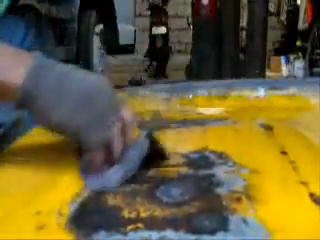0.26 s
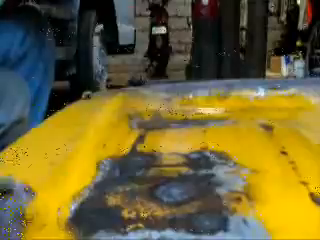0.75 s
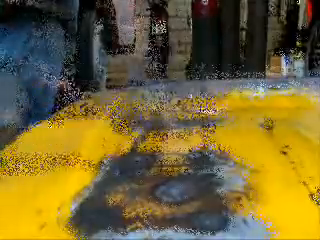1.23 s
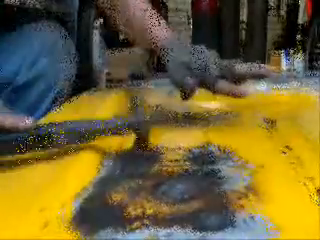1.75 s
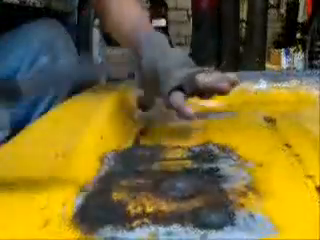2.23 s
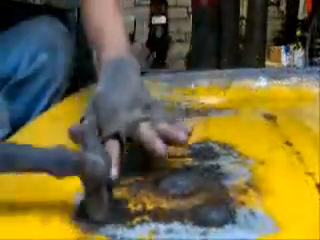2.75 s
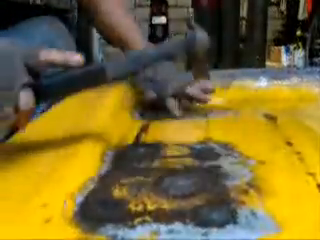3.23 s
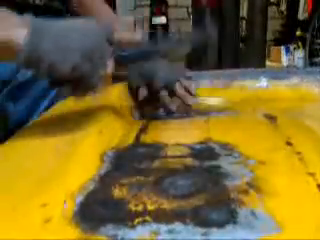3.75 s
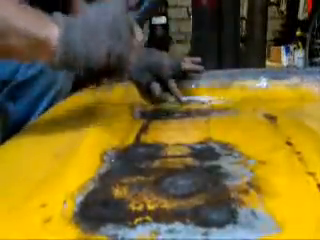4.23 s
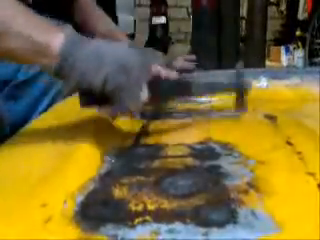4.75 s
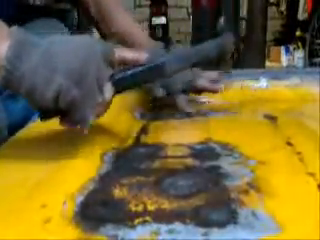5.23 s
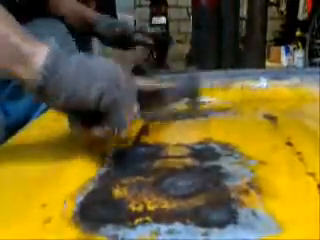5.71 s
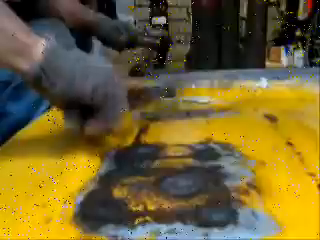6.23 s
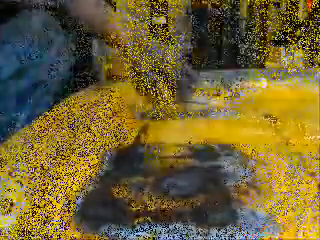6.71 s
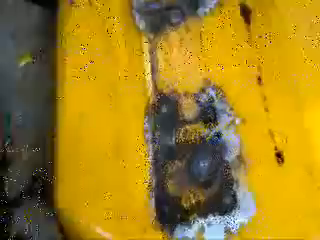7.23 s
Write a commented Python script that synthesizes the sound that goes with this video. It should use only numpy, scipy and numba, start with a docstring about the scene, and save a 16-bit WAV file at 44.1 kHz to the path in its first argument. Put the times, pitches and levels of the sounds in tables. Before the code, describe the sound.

In a reflective workshop, gas flame noise plays over a metal panel and quickly drops away. Hammer blows follow in three groups with short pauses, strongest in the middle, crashing and ringing with dull panel tones and a wobbling thud. After the last lighter hits come a tiny bright tick, growing torch hiss and a brief scrape. The close stereo recorder clips, ducks after blows and briefly cuts out.

```python
"""A workshop: a gas torch hisses on a sheet-steel panel, is put aside while a hammer beats it, then comes back.
Blows sum crowded decaying noise bands, panel modes, a thin high ring and a ragged falling twang that sags to a
thud, mostly on the left; the torch is shaped noise split into hiss and roar. A light touch on the sheet and a
closing rasp follow. A recorder close by turns its gain down after each blow and clips the peaks; once, the
sound briefly drops out."""
import sys
import numpy as np
from scipy import signal
from scipy.fft import rfft, irfft, next_fast_len
from scipy.io import wavfile
from scipy.ndimage import uniform_filter1d
from numba import njit

SR = 44100
rng = np.random.default_rng(int(sys.argv[2]) if len(sys.argv) > 2 else 0)


def log_audio(samples):
    """Write samples as a 16-bit WAV file to the path given in sys.argv[1]."""
    # one column per channel
    frames = np.atleast_2d(samples).T
    # limit to full scale, then quantise
    limited = np.clip(frames, -1, 1)
    pcm = np.round(limited * 32767).astype(np.int16)
    wavfile.write(sys.argv[1], SR, pcm)


N = 329427
TIME = np.arange(N) / SR
SINCE_BLOW = TIME[:2 * SR]  # s
SIDES = np.array([[1], [-1]])  # left, right
TOP_HZ = 10000

# Blows on the panel, the first perhaps a hand or the torch being set down, the rest a hammer.
# Each row: start in seconds, strength in dB, crash tilt in dB per octave,
# relative twang level in dB, twang fall time in seconds, right-port twang relative to left in dB.
BLOWS = [(1.153, -11.5, 2, -13, 0.085, -10), (1.793, -5.5, 1.5, -8.5, 0.023, -17),
         (2.194, -3, 0, 0.5, 0.064, -22), (2.527, -1, 0, 0.5, .031, -14), (2.755, -1.5, 0, 2, 0.059, -19),
         (3.002, 1.5, 1, 2, .063, -17), (4.04, 0, 1, -1, 0.052, -14), (4.387, 2, 1.5, -3, 0.044, -9.5),
         (4.708, 2.5, 1.5, -1, .042, 2.5), (5.714, -2.5, .5, -31, 0.014, 0), (6.026, -6, .5, -26, .02, -11),
         (6.263, -4.5, 1.5, -31, 0.0093, 2)]
# Strongest panel modes. Each row: frequency in Hz, relative level in dB, t60 in seconds.
PANEL_MODES = [(86.6, -14, 1.95), (130.5, -11.5, 1.42), (172.9, 4.5, 0.61), (192.5, -2.5, 0.51),
               (236, 1, 0.66), (293, -8, 1.11), (360, -21.5, 0.41), (389.5, 1.5, 0.67), (450, -16, 0.34),
               (542, 5, 0.57), (598, 2, 0.51), (614, -12.5, 1.17), (732, -4, 0.58), (1067, 0.5, 0.45),
               (1495, -8, .2), (1680, -14, .18)]
# Thin high modes, as of a hammer head. Each row: frequency in Hz, relative level in dB, t60 in seconds.
HIGH_MODES = [(8050, -39, .22), (8665, -33, .13), (8980, -39, .13), (9300, -43, .2)]
CONTACT_S, TWANG_RISE_S = 0.0035, 0.005  # time constants
TWANG_START_HZ, TWANG_OCTAVES_PER_DB = 3001, 0.2  # start at 0 dB strength; harder blows start higher


def blows(crash_db=6.5, echo_db=-6, panel_db=-16, high_db=3, twang_db=5):
    """Every blow sets off the crash, the panel's ring, a thin high ring and the twang."""
    crashes, out = np.zeros((2, 2, N))
    for start_s, strength_db, tilt_db, fall_db, fall_s, right_db in BLOWS:
        # the contact takes a moment to load the sheet
        push = undb(strength_db) * (1 - np.exp(-SINCE_BLOW / CONTACT_S))
        sheet = undb(crash_db) * crash(tilt_db, decay_factor=.9)
        add(crashes, sheet * push[:sheet.shape[1]], start_s)

        rings = undb(panel_db) * ring(PANEL_MODES) + undb(high_db) * ring(HIGH_MODES)
        add(out, rings * push, start_s)

        start_hz = TWANG_START_HZ * 2 ** (TWANG_OCTAVES_PER_DB * strength_db)
        ports = np.array([undb(port_db) * twang(fall_s, start_hz) for port_db in (0, right_db)])
        rise = 1 - np.exp(-SINCE_BLOW[:ports.shape[1]] / TWANG_RISE_S)
        add(out, undb(fall_db + twang_db) * ports * rise, start_s)
    return out + early_echoes(crashes, echo_db)


# Crowded upper modes of the sheet.
# Each row: frequency in Hz, relative level in dB per Hz, t60 in seconds before decay_factor.
CRASH_BANDS = [(50, -16, 0.28), (97.3, -12, 0.38), (158, 0.5, 0.67), (615, 2.5, 0.51), (770, -2, 0.37),
               (1070, -1, 0.31), (2020, -3, 0.24), (2680, -8.5, 0.25), (3870, -9, 0.24), (6300, -20.5, .18),
               (7100, -34.5, 0.14), (9600, -43.5, 0.13)]


def crash(tilt_db, decay_factor, room_db=-21, room_t60_s=0.85, hold_s=0.009, rattle_db=1.0, size=36000):
    """Crowded modes rattle while the sheet buckles, then die treble first; the workshop keeps a weaker tail."""
    t = SINCE_BLOW[:size]
    out = np.zeros((2, size))
    age = np.hypot(t, hold_s) - hold_s  # decay starts gently
    rattle = undb(rattle_db * walk(159.7, size))
    room = undb(room_db - 60 * t / room_t60_s)
    for hz, pair in noise_bands(size):
        t60_s = over_hz(CRASH_BANDS, hz, axis=2) * decay_factor
        sheet = rattle * undb(-60 * age / t60_s)
        build = 1 - np.exp(-t * hz / 4.9)  # time constant of 4.9 cycles
        level = undb(over_hz(CRASH_BANDS, hz) + tilt_db * np.log2(hz / 1000))
        out += pair * np.hypot(sheet, room) * build * level
    return out


def ring(modes, scatter_db=2.5):
    """Decaying modes; each struck spot weights them anew, and short waves reach the ports out of step."""
    out = np.zeros((2, len(SINCE_BLOW)))
    for hz, db, t60_s in modes:
        size, detune, spread = rng.standard_normal(3)
        phase = 2 * np.pi * (hz * (1 + .003 * detune) * SINCE_BLOW + rng.random())
        port_phase = SIDES * spread * min(hz / 600, 1)
        port_gain = undb(.5 * SIDES * over_hz(PORTS, hz, axis=2))
        decay = undb(db + scatter_db * size - 60 * SINCE_BLOW / t60_s)
        out += port_gain * decay * np.sin(phase + port_phase)
    return out


def twang(fall_s, start_hz, knee_hz=170, thud_hz=26, sag_s=0.0066, fade_s=0.015,
          waver=.3, rough=0.35, swell_db=4, flap=0.37):
    """Bending waves run through the sheet treble first: a ragged tone swells as it falls, then sags to a thud."""
    t = SINCE_BLOW[:SR // 4]
    size = len(t)
    to_come = np.clip(1 - t / fall_s, 0, 1)  # share of the fall still ahead
    after_s = np.maximum(t - fall_s, 0)
    hz = knee_hz * (start_hz / knee_hz) ** to_come * np.exp(-after_s / sag_s) + thud_hz
    hz = hz * np.exp(waver * (walk(908, size) + .5 * walk(130.0, size)))
    tone = (1 + rough * walk(300, size)) * np.sin(2 * np.pi * np.cumsum(hz) / SR)
    flapping = flap * walk(320.4, size)  # the sheet flaps unevenly under the tone
    return (tone + flapping) * undb(-swell_db * to_come) * np.exp(-after_s / fade_s)


# Flame on the steel. Each row: time in seconds, relative hiss level in dB, roar level in dB.
HEATING = [(0.0, -24, -24), (0.042, -25.5, -29.5), (0.548, -24.5, -26), (0.81, -23.5, -29),
           (0.894, -26.5, -26.5), (1.12, -22.5, -29.5)]
# Hiss level of the flame to one side, dipping and recovering. Each row: time in seconds, hiss level in dB.
ASIDE = [(1.6, -40.5), (2.1, -47), (2.4, -39), (3.4, -40), (3.95, -36.5), (5.1, -40.5), (5.35, -36),
         (6.5, -46)]
# Flame colour on the steel. Each row: frequency in Hz, relative level in dB per Hz.
HEATING_COLOUR = [(18, -43), (30, -16.5), (113, -6.5), (371, -9), (546, -1), (647, -3.5), (907, -17),
                  (1180, -11), (1740, -15.5), (2010, -6.5), (2690, -12.5), (3450, -2.5), (4450, -7.5),
                  (5100, -12.5), (6130, -14), (9700, -29.5), (12600, -52), (21300, -120)]
# Flame colour to one side. Each row: frequency in Hz, relative level in dB per Hz.
ASIDE_COLOUR = [(18, -54), (30, -32), (54, -2.5), (70, -7.5), (91, -8.5), (103, -12), (180, -10.5),
                (380, -16.5), (631, -8.5), (952, -25.5), (1070, -21), (4370, -6), (9700, -28),
                (12600, -105), (21300, -120)]
# Flame colour on its return. Each row: frequency in Hz, relative level in dB per Hz.
RETURN_COLOUR = [(18, -36), (30, -12), (68, 0.5), (93, -10), (128, -4), (277, -9.5), (429, -3), (546, -7),
                 (616, -7), (1620, -15), (4160, -2.5), (5980, -5), (9700, -14.5), (12600, -45),
                 (21300, -120)]
HEATING_HISS_DB = -0.5  # overall hiss level
SWING_S, SWING_END_S, BACK_S = 1.3, 1.72, 6.55
SWING_HISS_DB_PER_S, SWING_ROAR_DB_PER_S = 50, 29  # fall
ASIDE_ROAR_DB = -44
RETURN_HISS_DB, RETURN_ROAR_DB = -33, -37
NEARING_HISS_DB_PER_S, NEARING_ROAR_DB_PER_S = 8, 7  # rise


def torch():
    """The flame heats the steel, swings away and falls off evenly, burns to one side, then nears the panel."""
    away_s, back_s = np.maximum(TIME - SWING_S, 0), np.maximum(TIME - BACK_S, 0)
    knot_s, hiss_db, roar_db = np.transpose(HEATING)
    hiss_db = np.interp(TIME, knot_s, hiss_db) + HEATING_HISS_DB - SWING_HISS_DB_PER_S * away_s
    roar_db = np.interp(TIME, knot_s, roar_db) - SWING_ROAR_DB_PER_S * away_s
    heating = flame(0, SWING_END_S, hiss_db, roar_db, HEATING_COLOUR,
                    pan_share=0.7, fade_s=.06, flutter_db=0.5, flicker_db=3.0)

    aside_hiss_db = np.interp(TIME, *np.transpose(ASIDE))
    aside = flame(ASIDE[0][0], BACK_S, aside_hiss_db, ASIDE_ROAR_DB, ASIDE_COLOUR,
                  pan_share=0.7, fade_s=.1, flutter_db=1.5, flicker_db=6.0)

    return_hiss_db = RETURN_HISS_DB + NEARING_HISS_DB_PER_S * back_s
    return_roar_db = RETURN_ROAR_DB + NEARING_ROAR_DB_PER_S * back_s
    back = flame(BACK_S, TIME[-1], return_hiss_db, return_roar_db, RETURN_COLOUR,
                 pan_share=0.36, fade_s=.025, flutter_db=0.55, flicker_db=2.5)
    return heating + aside + back


def flame(from_s, to_s, hiss_db, roar_db, colour, pan_share, fade_s, flutter_db, flicker_db):
    """Gas hisses at the nozzle and the flame roars below it; the roar flutters up to twice as deep in dB."""
    gate = np.interp(TIME, [from_s - fade_s, from_s, to_s, to_s + fade_s], [0, 1, 1, 0])
    span = gate > 0
    size = span.sum()
    flutter = walk(22.29, size)  # shared by all bands
    roar, hiss = np.zeros((2, 2, size))
    for hz, pair in noise_bands(size, pan_share, count=44):
        jet = np.clip(np.log2(hz / 1400), 0, 1)  # share of the band that belongs to the hiss
        unrest_db = (1 - .5 * jet) * (flutter_db * flutter + flicker_db * walk(17, size))
        band = pair * undb(over_hz(colour, hz) + unrest_db)
        hiss += jet * band
        roar += (1 - jet) * band
    hiss_gain = (gate * undb(hiss_db))[span] / band_rms(hiss, 2500, 7000)
    roar_gain = (gate * undb(roar_db))[span] / band_rms(roar, 200, 1500)
    out = np.zeros((2, N))
    out[:, span] = hiss * hiss_gain + roar * roar_gain
    return out


def tick(start_s=6.645, level_db=-22.5, tilt_db=4, decay_factor=.26):
    """A light touch on the sheet gives only a short, bright crash."""
    out = np.zeros((2, N))
    add(out, undb(level_db) * crash(tilt_db, decay_factor), start_s)
    return out


# Closing rasp. The one row: swell start in seconds, full level in seconds.
RASP_SPAN = (7.38, 7.45)


def rasp(hz, db, grain_db=2):
    """A grainy octave of noise swells at the end."""
    sos = signal.butter(2, [hz / np.sqrt(2), hz * np.sqrt(2)], "band", fs=SR, output="sos")
    grain = signal.sosfilt(sos, rng.standard_normal((2, N))) * undb(grain_db * walk(90, N))
    return grain / np.std(grain) * undb(db) * np.interp(TIME, RASP_SPAN, [0, 1])


def early_echoes(x, echo_db, span_s=.022, low_hz=700, count=24):
    """Hard surfaces nearby return the upper band within moments and comb it finely."""
    taps = np.zeros(SR // 10)
    delay_s = np.clip(span_s * rng.uniform(.1, 1, count), 0, .09)
    np.add.at(taps, (SR * delay_s).astype(int), rng.choice([-1, 1], count))
    sos = signal.butter(2, low_hz, "high", fs=SR, output="sos")
    response = signal.sosfilt(sos, taps) * undb(echo_db) / np.sqrt(count)
    response[0] += 1  # direct sound
    return signal.oaconvolve(x, response[None], axes=1)[:, :N]


# The two close microphone ports.
# Each row: frequency in Hz, correlation before clipping to +-0.95, left minus right in dB at full pan share.
PORTS = [(60, 0.4, 2), (150, 0.9, -3), (300, 0.82, -0.5), (580, 0.75, -5.5), (1110, 0.04, 7.5),
         (2600, 0, 5.5), (4500, 0.38, 1.5), (6140, 0.79, -0.5), (8850, 0.01, -14)]


def noise_bands(size, pan_share=1, count=26):
    """Yields centre Hz and stereo noise at the ports; the bands adjoin and sum to white before port shaping."""
    centres = np.geomspace(30, TOP_HZ, count)
    length = next_fast_len(size, real=True)
    log_hz = np.log(np.arange(length // 2 + 1) * SR / length + 1)
    white = rfft(rng.standard_normal((2, length))).astype(np.complex64)
    for hz, share in zip(centres, np.eye(count)):
        weight = np.interp(log_hz, np.log(centres), share).astype(np.float32)
        mid, side = irfft(white * weight, length)[:, :size]
        alike = np.clip(over_hz(PORTS, hz), -.95, .95)
        pair = np.sqrt(1 + alike) * mid + np.sqrt(1 - alike) * SIDES * side
        yield hz, pair * undb(.5 * SIDES * pan_share * over_hz(PORTS, hz, axis=2))


def undb(db):
    """Decibels to gain."""
    return 10 ** (np.asarray(db) / 20)


def over_hz(table, hz, axis=1):
    """One column of a table, read on a log-frequency axis."""
    table = np.array(table)
    return np.interp(np.log(hz), np.log(table[:, 0]), table[:, axis])


def walk(rate_hz, size):
    """Random values at rate_hz joined by straight lines, spread about 0.8."""
    steps = np.arange(size) / SR * rate_hz
    knots = rng.standard_normal(int(steps[-1]) + 2)
    return 0.98 * np.interp(steps, np.arange(len(knots)), knots)


def band_rms(x, low_hz, high_hz):
    """Level of the mid channel of a stereo sound within one band."""
    sos = signal.butter(2, [low_hz, high_hz], "band", fs=SR, output="sos")
    return np.std(signal.sosfilt(sos, x.mean(axis=0)))


def add(out, sound, start_s):
    """Mixes a sound in at a start time."""
    start = int(start_s * SR)
    out[:, start:start + sound.shape[1]] += sound[:, :N - start]


def scene():
    """The blows, the torch, a light tick and the closing rasp."""
    return blows() + early_echoes(torch(), echo_db=-11.5) + tick() + rasp(hz=1070, db=-25.5)


@njit
def follow(x, attack, release):
    """Level follower that rises fast and sinks slowly."""
    out, level = np.empty(len(x)), 0.
    for i in range(len(x)):
        level += (x[i] - level) * (attack if x[i] > level else release)
        out[i] = level
    return out


# Brief dropout. The one row: start in seconds, end in seconds.
DROPOUT = (2.879, 2.965)


def record(dry, knee_db=-11, squeeze=0.39, attack_s=0.0029, release_s=0.38, ahead_s=.003):
    """Gain control ducks after each blow, the peaks clip and the top is cut; once, the sound briefly drops out."""
    level = follow(np.abs(dry).max(axis=0), 1 / (attack_s * SR), 1 / (release_s * SR))
    level = np.interp(TIME + ahead_s, TIME, level)  # the gain control looks ahead
    ducked = dry * np.minimum(undb(knee_db) / (level + 1e-9), 1) ** squeeze
    is_open = (TIME < DROPOUT[0]) | (TIME > DROPOUT[1])
    open_share = uniform_filter1d(1. * is_open, size=400)
    clipped = np.clip(ducked, -.95, .95) * np.maximum(open_share, undb(-50))
    return signal.sosfilt(signal.ellip(10, .2, 70, TOP_HZ, fs=SR, output="sos"), clipped)


dry = scene()
out = record(dry)
log_audio(out)
```